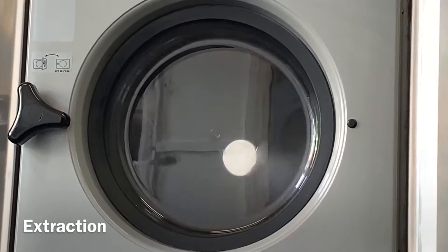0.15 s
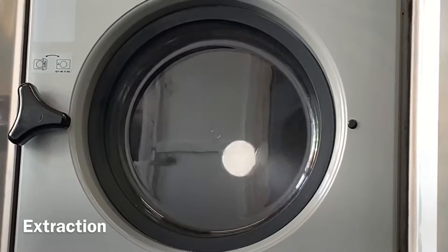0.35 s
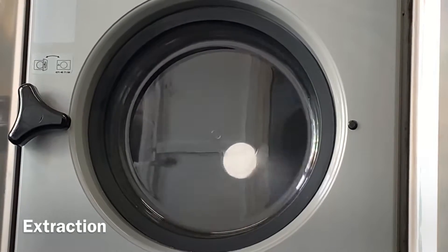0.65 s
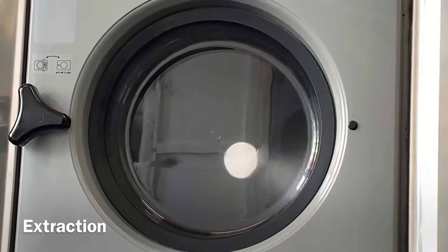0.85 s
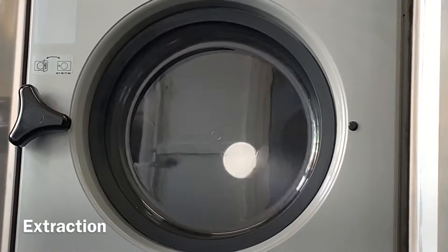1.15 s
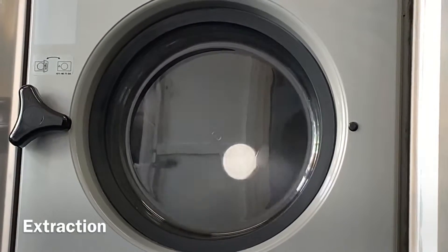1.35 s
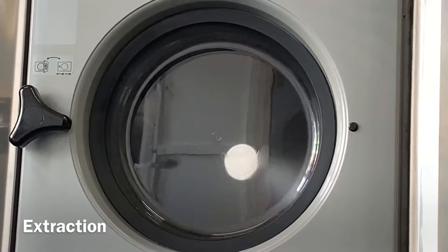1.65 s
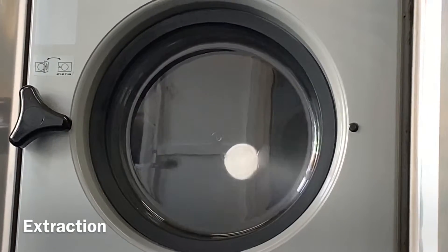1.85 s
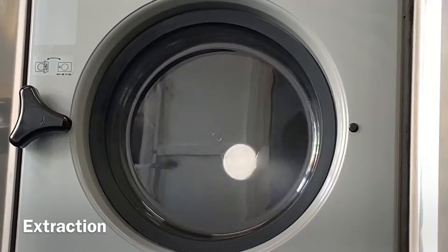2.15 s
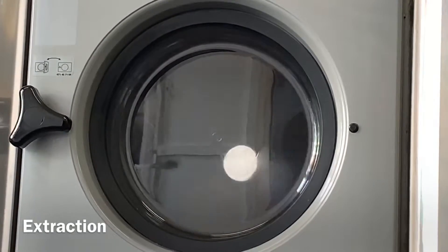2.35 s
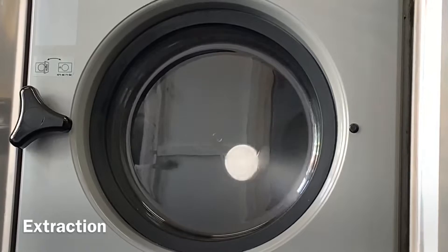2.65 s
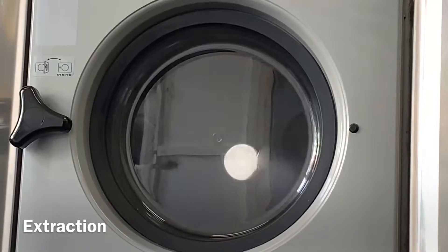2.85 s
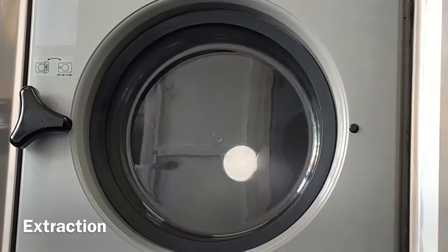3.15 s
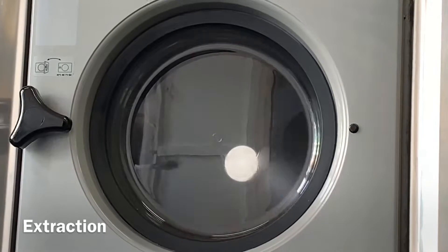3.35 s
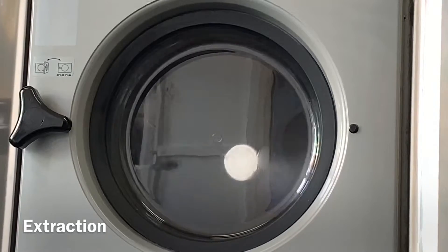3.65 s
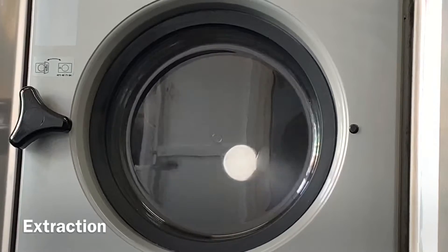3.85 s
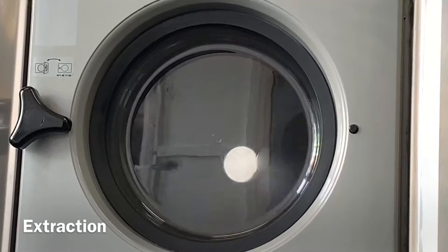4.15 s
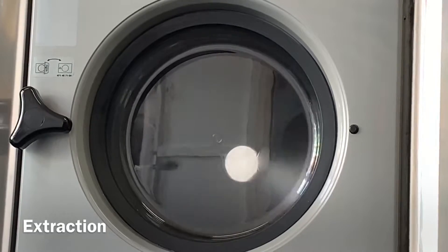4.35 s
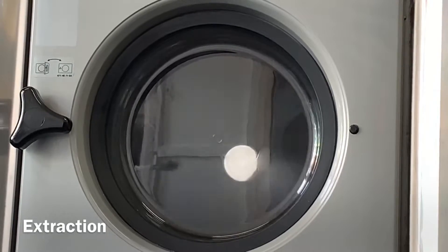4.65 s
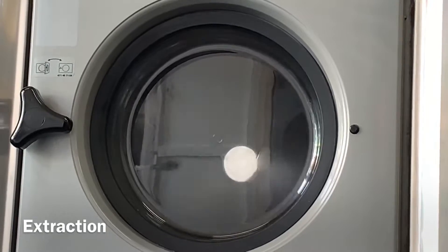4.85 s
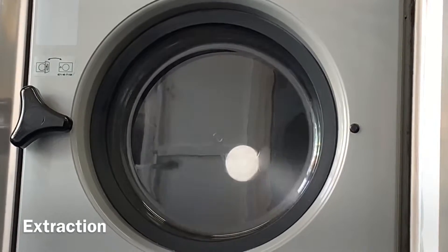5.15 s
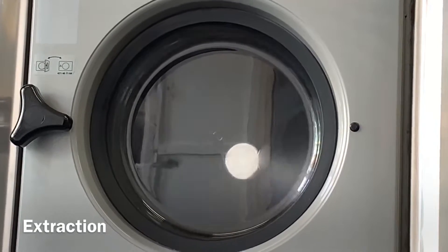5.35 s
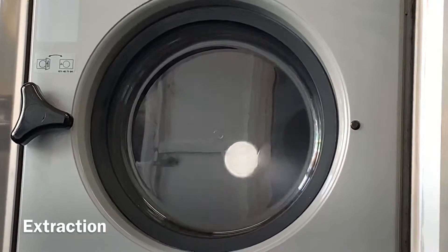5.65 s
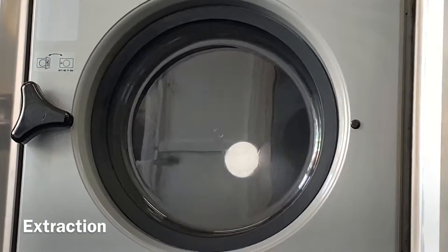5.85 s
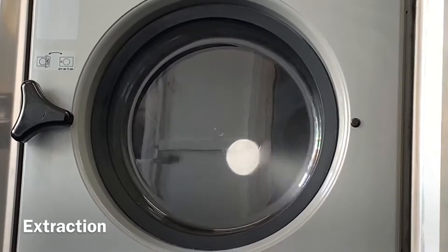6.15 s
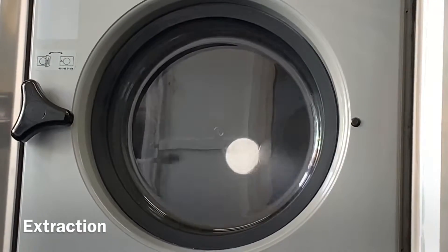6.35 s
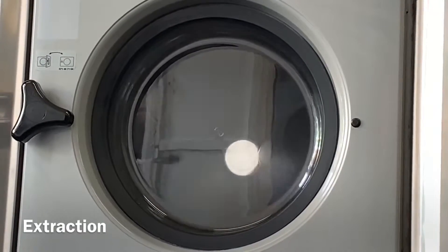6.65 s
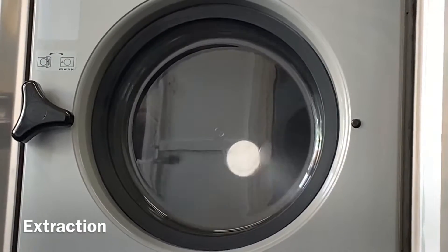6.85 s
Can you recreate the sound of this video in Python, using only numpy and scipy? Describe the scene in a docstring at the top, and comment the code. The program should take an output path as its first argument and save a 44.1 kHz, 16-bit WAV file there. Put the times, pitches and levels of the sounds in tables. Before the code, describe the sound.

Close to a laundrette washer in fast spin: throbbing low hum, rumbling bearings, fluttering high motor whine, soft air hiss and loose metal rattles.

```python
"""A laundrette, a stereo microphone close to the door of a commercial washing machine spinning at 408 turns a minute.
From the start two neighbouring multiples of the drum speed beat once a turn: a deep, pulsing cabinet hum.
Bearings and belt rumble through the panels, the motor drive whines and air hisses round the drum throughout.
The cabinet thuds twice in the first half second; panels knock, boom and shudder all along, and water ticks.
Near six seconds faint clinks ring in the drum, and a softer thud joins them."""
import sys
import numpy as np
from scipy import signal
from scipy.fft import rfft, irfft, next_fast_len
from scipy.io import wavfile

SR = 44100
rng = np.random.default_rng(int(sys.argv[2]) if len(sys.argv) > 2 else 0)


def file_out(sig):
    """Save sig as 16-bit WAV at sys.argv[1]."""
    # one column per channel
    cols = np.atleast_2d(sig).T
    # limit, then scale
    lim = np.clip(cols, -1, 1)
    pcm = np.round(lim * 32767).astype(np.int16)
    wavfile.write(sys.argv[1], SR, pcm)


N = 309141
TIME = np.arange(N) / SR
SIZE = next_fast_len(N, real=True)
BINS = np.arange(SIZE // 2 + 1) * SR / SIZE   # frequencies in Hz
SIDES = np.array([[1], [-1]])   # left, right: a positive left-right dB leans left

# Points in a turn are counted from the heavy side, which comes round at HEAVY_S.
DRUM_HZ, HEAVY_S = 6.8014, .079
BELT_HZ, BELT_SLAP_S = 17.72, .0367   # rounds of the belt, and when its stiff spot passes
MOTOR_HZ, FIELD_HZ, MAINS_HZ, PUMP_HZ = 49.46, 49.87, 50.02, 94.3   # the rotor slips behind its field
PUMP_DB = -57
DOOR_GAP_LAG_S = .000264   # how much later air from the door gap reaches the left
CUTOFF_HZ = 15800
SCATTER_DB, SCATTER_RAD = 1.5, .15   # spread of balance and lead from standing waves in the room
SIDEBAND_TILT_DB = 3.5   # per sideband: those below the pair are louder, those above softer
WHIRR_WAVER_DB, ROCKING_RAD = 3, .35
FADE_HZ, FADE_DB, FADE_RAD = 9, 1.2, .15   # quick flutter of the whine
SURGE_HZ, SURGE_DB = 2.5, .9   # its slower surges
RING_ROUGH_HZ, RING_ROUGH_RAD = 55, .45
BOOM_HZ, BOOM_S = 367, .034
SHUDDER_HZ, SHUDDER_S = 288.7, .021
THUD_HZ, THUD_WIDTH_HZ, THUD_S = 36.3, 53, .024
TICK_HZ, TICK_WIDTH_HZ, TICK_S = 9900, 5400, .014
CLINK_WIDTH_HZ, CLINK_S = 330, .014

# Rush of air round the drum. Each row: frequency in Hz, level in dB per Hz.
AIR = [(700, -104), (1300, -86.5), (1700, -89.5), (2100, -89.5), (2580, -91), (2760, -92.5), (3000, -91.5),
       (4000, -101), (4750, -96), (5400, -100.5), (6300, -108), (7700, -114), (8300, -105), (8800, -104),
       (9800, -113.5), (12500, -116.5), (16000, -126)]
# Share of the rush straight from the door gap, held to 0.9 at most. Each row: frequency in Hz, share (0-1).
AIR_DIRECT = [(1300, 0.02), (4500, 0), (6500, 0.1), (7800, 0.8), (16000, 1)]
# Lean of the rush. Each row: frequency in Hz, left-right balance in dB.
AIR_BALANCE = [(1300, 4.5), (2700, 1.5), (4200, 1.5), (6400, -3), (9000, -0.5)]
# Broad rumble of the running gear, before its roll-off. Each row: frequency in Hz, level in dB per Hz.
RUMBLE = [(10, -93), (22, -80), (30, -68), (40, -75), (50, -65.5), (80, -64.5), (100, -63.5), (118, -72.5),
          (135, -71), (170, -75), (230, -74), (400, -78.5), (600, -80.5), (780, -79), (1150, -83.5),
          (1500, -94.5)]
# Likeness of the rumble on the two sides, held to 0.995 at most. Each row: frequency in Hz, likeness (0-1).
LIKENESS = [(40, 1), (80, 0.97), (120, 0.86), (180, 0.88), (270, 0.79), (400, 0.71), (650, 0.38),
            (940, 0.7), (1300, 0.54)]
# Lean of the rumble. Each row: frequency in Hz, left-right balance in dB.
BALANCE = [(60, -1.5), (140, 6), (200, -2.5), (380, 0), (700, 3), (950, 3), (1300, 2.5)]
# Panel resonances, before lean and roll-off. Each row: frequency in Hz, width in Hz, level in dB per Hz,
# swell in dB, point of the swell in turns, belt throb in dB.
PANELS = [(188.6, 11, -70.5, 1, 0.25, -0.5), (256, 13.4, -72.5, -1, 0.35, -0.5),
          (284.4, 20, -69, 1.5, 0.3, -2), (364.7, 23, -68, 1, 0.0302, 1.5), (458.8, 14, -71, 2.5, 0.9, 1),
          (492.8, 15, -73.5, 2, 0.75, 0.5), (577.7, 9, -69.5, 2.5, 0.73, -2), (640.5, 44, -73, 2, 0.599, 2),
          (685.3, 13, -73.5, -0.5, .2, -1.5), (918, 27.3, -68.5, 0.9, 0.15, 1),
          (975, 58, -73.5, 0.8, 0.64, 5), (1159, 21, -79.5, 0.5, .45, -1)]
# The cabinet thuds on its feet. Each row: centre in seconds, level in dB.
THUDS = [(0.335, -35), (0.43, -38), (5.975, -43)]
# Ticks of water. Each row: centre in seconds, level in dB.
TICKS = [(0.83, -79), (3.184, -75.5), (3.537, -75), (5.28, -79)]
# Faint clinks in the drum. Each row: centre in seconds, level in dB before that of each mode is added.
CLINKS = [(5.612, -72), (6.075, -77), (6.165, -74), (6.24, -77)]
# What a clink rings with. Each row: frequency in Hz, level in dB added to the clink.
CLINK_MODES = [(3970, 4), (5540, -1), (6550, -10)]
# A loose panel knocks. Each row: centre in seconds, level in dB before trim, frequency in Hz, length in seconds.
KNOCKS = [(0.091, -42.5, 940, 0.015), (0.15, -46.5, 967, .03), (0.252, -39, 950, .012),
          (0.47, -48.5, 918, 0.056), (0.55, -42.5, 918, 0.022), (0.87, -50, 913, .04),
          (1.06, -47.5, 931, 0.025), (1.42, -47, 940, 0.027), (1.51, -46.5, 920, 0.037),
          (1.14, -48, 975, .03), (1.64, -47, 958, .035), (1.76, -54, 954, 0.036), (1.96, -46, 926, .035),
          (2.012, -37, 917, 0.018), (2.22, -46, 972, 0.02), (2.477, -46, 913, 0.011),
          (2.68, -46, 922, 0.048), (2.745, -44, 933, .025), (2.865, -44, 960, 0.024),
          (3.195, -38.5, 920, 0.012), (3.25, -45, 968, .02), (3.48, -49, 921, 0.065),
          (3.635, -41, 930, 0.0098), (3.79, -44.5, 920, 0.04), (4.373, -43, 916, .025),
          (4.495, -40, 913, .028), (4.655, -38, 916, 0.0084), (4.89, -44.5, 946, 0.012),
          (4.956, -40.5, 920, 0.015), (5.105, -44.5, 929, 0.023), (5.395, -41, 920, 0.013),
          (5.931, -45.5, 942, 0.019), (6.078, -42.5, 928, 0.016), (6.205, -40, 930, 0.013),
          (6.29, -45, 985, .018), (6.355, -41.5, 936, 0.018), (6.44, -45, 947, .03),
          (6.804, -43, 925, 0.02)]
# Panel booms. Each row: centre in seconds, level in dB before trim.
BOOMS = [(0.18, -45), (0.40, -39), (0.962, -44), (1.55, -45), (1.68, -41.5), (2.03, -42.5), (2.79, -46),
         (3.49, -43), (3.76, -41.5), (3.909, -40.5), (4.029, -47), (4.51, -44), (4.66, -42), (5.09, -46),
         (5.391, -46), (5.52, -47), (5.70, -40.5), (5.98, -48), (6.10, -42), (6.73, -47)]
# Panel shudders. Each row: centre in seconds, level in dB before trim.
SHUDDERS = [(0.08, -46), (0.204, -46), (0.38, -44.5), (0.85, -46.5), (1.014, -46), (1.69, -48), (2.19, -43),
            (2.32, -46), (3.08, -47), (3.23, -49), (3.44, -44.5), (4.249, -47.5), (4.40, -49), (4.69, -51),
            (5.45, -45), (5.96, -49), (6.31, -47), (6.48, -46), (6.595, -44.5)]
# Whirr of the motor. Each row: frequency in Hz, level in dB about which it wavers.
WHIRR = [(2280, -77), (2450, -84), (2490, -80), (2570, -78.5), (2520, -81.5), (2590, -86), (2672, -87)]
# Switching tones of the motor drive: the lower and the upper, in Hz.
SWITCH_HZ = (2524, 4798)
# Mains-split pair round each switching tone. Each row: level in dB, left-right balance in dB and left lead in
# rad (of the lower tone; mirrored for the upper), drop to the first sideband in dB, further fall per sideband
# in dB (both before tilt), swell in dB, point of the swell in turns.
WHINE_PAIRS = [(-62, 2, 2.48, 13, 7, .8, .5), (-67.6, 1, 1.55, 14, 7, 1.1, .07)]
# Sidebands of the upper switching tone. Each row: offset in multiples of the rotor speed, level in dB.
ROTOR_SIDEBANDS = [(-9, -82.5), (5, -87), (8, -88), (9, -80.5), (11, -89), (13, -85), (15, -89)]
# Hum of the rotor, its field and the mains. Each: level in dB of a low multiple, level in dB of a high one.
ROTOR_DB = (-54, -64.5)
FIELD_DB = (-62, -61)
MAINS_DB = (-54.5, -61)
# Bearing tones. Each row: multiple of the drum speed, level in dB, left-right balance in dB.
BEARINGS = [(15, -55, 3), (18, -59, 5), (22, -63, 1), (25, -66, 1), (28, -64, 0), (54, -61, 2),
            (55, -58, 0), (56, -66, 2), (58, -68, -5), (62, -68, 2), (67, -69, 0), (91, -60.5, 1),
            (93, -71, -3), (96, -62.5, 5), (99, -66, 3), (135, -64, 4), (137, -66, 2), (140, -64.5, 4),
            (143, -66, 1), (144, -63, 0), (148, -64.5, 3), (152, -67.5, -2), (166, -76, 8), (168, -76, 8),
            (171, -77, 0)]
# Cabinet hum. Each row: multiple of the drum speed, level in dB, left-right balance in dB, waver in dB.
HUM = [(7, -65.5, 0, .8), (8, -62, -1, .8), (9, -62, -2, .8), (10, -37.7, 1, .35), (11, -38, -2, .35),
       (12, -51.2, 2, .7), (13, -54, 1, .7), (14, -66, 0, 1)]


def from_db(db):
    """Decibels to gain."""
    return 10 ** (np.asarray(db) / 20)


def over_bins(points):
    """Join (Hz, value) points on a log-frequency axis."""
    hz, value = np.transpose(points)
    return np.interp(np.log(BINS + 1), np.log(hz), value)


def drift(rate):
    """Smooth chance with spread about 1, changing about rate times a second."""
    steps = signal.resample_poly(rng.standard_normal(1000), 10, 1)
    return np.interp((TIME * rate + 10) * 10, np.arange(len(steps)), steps)


def white(count):
    """Rows of white noise at 0 dB per Hz."""
    return rng.standard_normal((count, SIZE)) * np.sqrt(SR / 2)


def to_time(spectrum):
    """Spectrum to samples."""
    return irfft(spectrum, SIZE)[..., :N]


def resonance(hz, width_hz):
    """Response of one damped mode, 1 on top."""
    damping = 1j * BINS * width_hz
    return damping / (hz ** 2 - BINS ** 2 + damping)


def level_power(gain):
    """Scale a gain to mean power 1."""
    return gain / np.sqrt(np.mean(gain ** 2))


def swell(depth_db, point, second=0.78):
    """Gain in step with the drum: once a turn at the given point, plus a share for the rebound twice a turn."""
    angle = 2 * np.pi * (DRUM_HZ * (TIME - HEAVY_S) - point)
    return level_power(from_db(depth_db * (np.cos(angle) + second * np.cos(2 * angle))))


def belt_throb(depth_db):
    """Gain that moves each time the stiff spot of the belt goes round."""
    return level_power(from_db(depth_db * np.cos(2 * np.pi * BELT_HZ * (TIME - BELT_SLAP_S))))


def placed(angle, db, pan_db, lead):
    """A sine of the given running angle, with its own level and phase on each side."""
    turn = SIDES * lead / 2
    wave = np.sin(angle) * np.cos(turn) + np.cos(angle) * np.sin(turn)
    return np.sqrt(2) * from_db(db + SIDES * pan_db / 2) * wave


def room_tone(hz, db, slip):
    """A free tone of wandering phase; standing waves in the room set its balance and lead."""
    balance, lead = rng.standard_normal(2)
    angle = 2 * np.pi * (hz * TIME + rng.random()) + slip
    return placed(angle, db, SCATTER_DB * balance, SCATTER_RAD * lead)


def fading(angle, db, pan_db, lead):
    """A placed sine whose level and phase flutter irregularly, on top of slower surges."""
    waver_db = FADE_DB * drift(FADE_HZ) + SURGE_DB * drift(SURGE_HZ)
    return placed(angle + FADE_RAD * drift(FADE_HZ), db + waver_db, pan_db, lead)


def bursts(events, hz, width_hz, length):
    """Short soft bursts of noise in one resonance, alike on both sides."""
    out = np.zeros(N)
    ringing = to_time(rfft(white(count=1)[0]) * resonance(hz, width_hz) ** 2)
    for s, db in events:
        shape = np.exp(-((TIME - s) / length) ** 2)
        burst = ringing * shape
        even_power = np.sqrt(np.sum(shape ** 2) / np.sum(burst ** 2))
        out += from_db(db) * burst * even_power
    return out


def ring_swells(events, gain_db, pan_db):
    """A panel mode swells and dies away, a little roughly, at each row of (s, dB, Hz, length s)."""
    out = np.zeros((2, N))
    rough = RING_ROUGH_RAD * drift(RING_ROUGH_HZ)
    for (s, db, hz, length), start in zip(events, rng.random(len(events))):
        near = np.abs(TIME - s) < 3 * length
        since = TIME[near] - s
        angle = 2 * np.pi * (hz * since + start) + rough[near]
        out[:, near] += placed(angle, db + gain_db, pan_db, 0) * np.exp(-(since / length) ** 2)
    return out


def air_rush(swell_db=0.65):
    """Hiss from the room all round, plus a direct part from the door gap that reaches the left side later."""
    direct = np.clip(over_bins(AIR_DIRECT), 0, .9)
    lag = np.exp(-1j * np.pi * BINS * DOOR_GAP_LAG_S * SIDES)
    around = np.sqrt(1 - direct) * rfft(white(count=2))
    from_gap = np.sqrt(direct) * lag * rfft(white(count=1))
    colour = from_db(over_bins(AIR) + SIDES * over_bins(AIR_BALANCE) / 2)
    return to_time((around + from_gap) * colour) * swell(swell_db, 0.39)


def rumble(repeat_share=0.066, swell_db=1.1, swell_point=0.4):
    """Rolling roughness, partly the same on every turn, shakes the frame and rings the panels."""
    one_turn = white(count=2)[:, :round(SR / DRUM_HZ)]
    repeating = one_turn[:, np.arange(SIZE) % one_turn.shape[1]]
    mid, side = rfft(np.sqrt(repeat_share) * repeating + np.sqrt(1 - repeat_share) * white(count=2))
    alike = np.clip(over_bins(LIKENESS), 0, .995)
    force = np.sqrt((1 + alike) / 2) * mid + SIDES * np.sqrt((1 - alike) / 2) * side
    force = force * from_db(SIDES * over_bins(BALANCE) / 2)
    force = force / np.sqrt(1 + (BINS / 1600) ** 12)   # roll-off above 1600 Hz
    out = to_time(force * from_db(over_bins(RUMBLE))) * swell(swell_db, swell_point)
    for hz, width_hz, db, depth_db, point, belt_db in PANELS:
        ringing = irfft(force * resonance(hz, width_hz), SIZE)
        # a shift of its own makes each panel ring independently
        ringing = np.roll(ringing, rng.integers(N // 10, N), axis=1)[:, :N]
        out = out + ringing * from_db(db) * swell(depth_db, point) * belt_throb(belt_db)
    return out


def knocks():
    """Panels ring up in knocks, booms and shudders; clinks, water ticks and thuds are bursts of noise."""
    boom_rows = [(s, db, BOOM_HZ, BOOM_S) for s, db in BOOMS]
    shudder_rows = [(s, db, SHUDDER_HZ, SHUDDER_S) for s, db in SHUDDERS]
    panels = ring_swells(KNOCKS, gain_db=-2.1, pan_db=2.5)
    panels = panels + ring_swells(boom_rows, gain_db=-3.0, pan_db=1.5)
    panels = panels + ring_swells(shudder_rows, gain_db=0.5, pan_db=-1.0)
    clinks = sum(from_db(db) * bursts(CLINKS, hz, CLINK_WIDTH_HZ, CLINK_S) for hz, db in CLINK_MODES)
    ticks = bursts(TICKS, TICK_HZ, TICK_WIDTH_HZ, TICK_S)
    thuds = bursts(THUDS, THUD_HZ, THUD_WIDTH_HZ, THUD_S)
    return panels + clinks + ticks + thuds


def switching_tones(rocking):
    """Each switching tone splits into a pair with sidebands at odd mains multiples; the rotor adds weaker ones."""
    out = sum(room_tone(SWITCH_HZ[1] + k * MOTOR_HZ, db, rocking) for k, db in ROTOR_SIDEBANDS)
    mains = 2 * np.pi * MAINS_HZ * TIME
    for hz, (db, pan_db, lead, drop_db, fall_db, depth_db, point) in zip(SWITCH_HZ, WHINE_PAIRS):
        carrier = 2 * np.pi * (hz * TIME + rng.random()) + rocking
        buzz = 0
        for way in (-1, 1):   # the lower tone leans left, the upper one right
            buzz = buzz + fading(carrier + way * mains, db, -way * pan_db, -way * lead)
            for k in range(2):
                angle = carrier + way * (2 * k + 3) * mains + np.pi * drift(1)
                side_db = db - drop_db - k * fall_db - way * (k + 1) * SIDEBAND_TILT_DB
                buzz = buzz + fading(angle, side_db, 0, SCATTER_RAD * rng.standard_normal())
        out = out + buzz * swell(depth_db, point, second=1.55)
    return out


def drive_whine(whirr_slip=0.86):
    """Switching tones flutter in phase as the motor rocks twice a turn; a looser whirr wavers among them."""
    rocking = ROCKING_RAD * np.sin(4 * np.pi * DRUM_HZ * TIME)
    whirr = 0
    for hz, db in WHIRR:
        whirr = whirr + room_tone(hz, db, whirr_slip * drift(9)) * from_db(WHIRR_WAVER_DB * drift(6))
    return switching_tones(rocking) + whirr


def gear_tones(motor_slip=0.53):
    """Rotor, field, mains and pump hum at speeds of their own, their phase wandering by motor_slip rad."""
    pitches = (MOTOR_HZ, 10 * MOTOR_HZ, 3 * FIELD_HZ, 6 * FIELD_HZ, 2 * MAINS_HZ, 6 * MAINS_HZ, PUMP_HZ)
    levels = (*ROTOR_DB, *FIELD_DB, *MAINS_DB, PUMP_DB)
    return sum(room_tone(hz, db, motor_slip * drift(3.36)) for hz, db in zip(pitches, levels))


def bearing_tones(bearing_slip=0.34):
    """Drum-locked tones near one panel fall into step where it is driven hardest, so they surge in clumps."""
    turns = DRUM_HZ * (TIME - HEAVY_S)
    centres, _, _, _, points, _ = np.transpose(PANELS)
    start = rng.random(len(PANELS))
    out = 0
    for k, db, pan_db in BEARINGS:
        panel = np.argmin(np.abs(centres - k * DRUM_HZ))
        angle = 2 * np.pi * (k * (turns - points[panel]) + start[panel]) + bearing_slip * drift(6)
        out = out + placed(angle, db, pan_db, SCATTER_RAD * rng.standard_normal())
    return out


def cabinet_hum(mode_hz=82.1, mode_width_hz=0.91):
    """Low multiples of the drum speed fall into step once a turn, so the hum throbs."""
    angle = 2 * np.pi * DRUM_HZ * (TIME - HEAVY_S)
    out = 0
    for k, db, pan_db, waver_db in HUM:
        # a cabinet mode delays its neighbours: a lopsided throb
        lag = 2 * np.arctan2(mode_width_hz / 2, mode_hz - k * DRUM_HZ)
        wave = np.sqrt(2) * np.cos(k * angle - lag) * from_db(waver_db * drift(4.14))
        out = out + wave * from_db(db + SIDES * pan_db / 2)
    return out


def scene():
    """All parts of the machine together at the microphone."""
    tones = cabinet_hum() + bearing_tones() + gear_tones() + drive_whine()
    return tones + rumble() + air_rush() + knocks()


def record(dry):
    """The sound opens over 3 milliseconds; the top is cut steeply."""
    opening = np.minimum(TIME / .003, 1)
    steep_cut = signal.ellip(10, .1, 80, CUTOFF_HZ, fs=SR, output="sos")
    return signal.sosfilt(steep_cut, dry * opening)


dry = scene()
out = record(dry)
file_out(out)
```